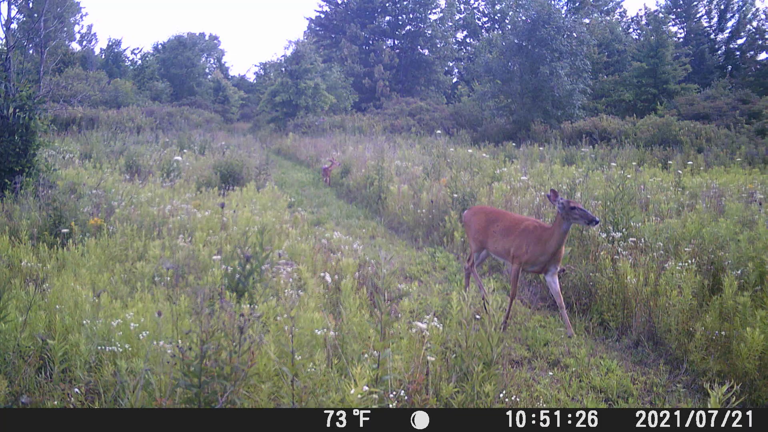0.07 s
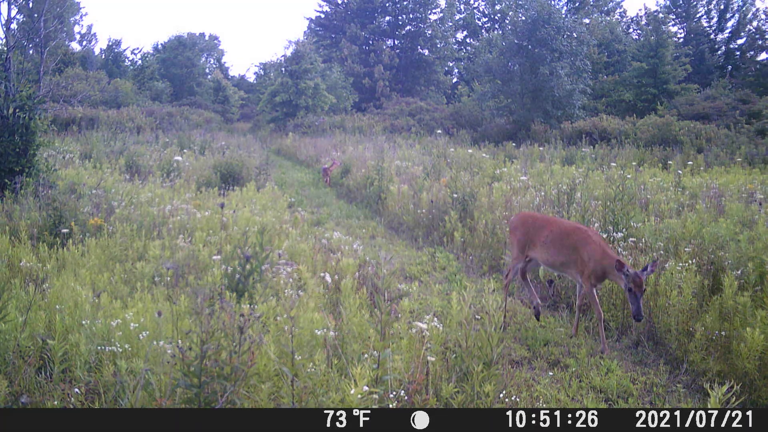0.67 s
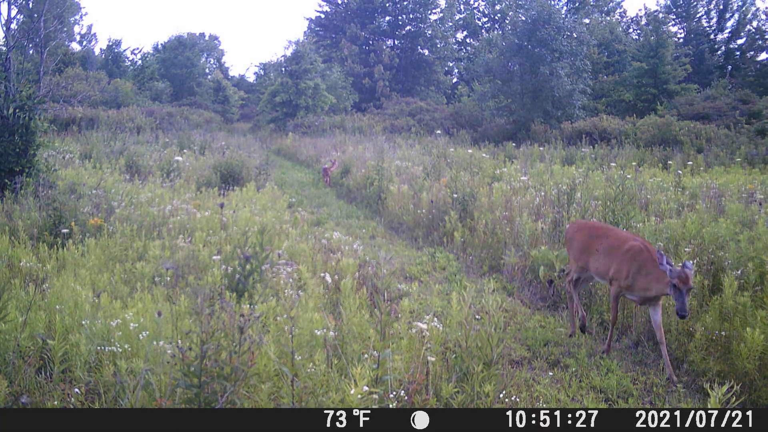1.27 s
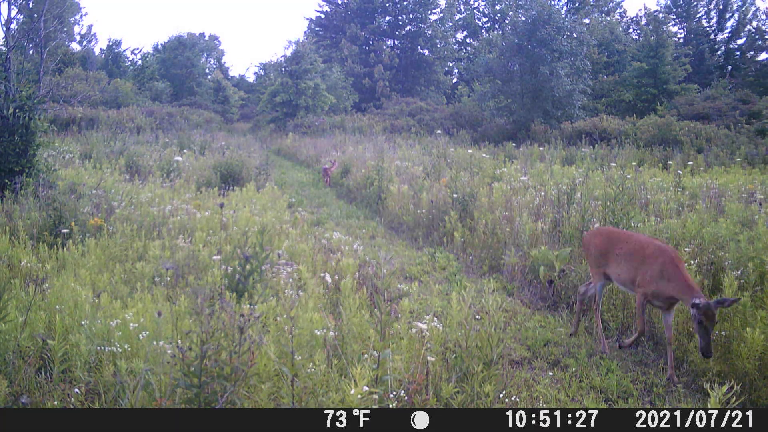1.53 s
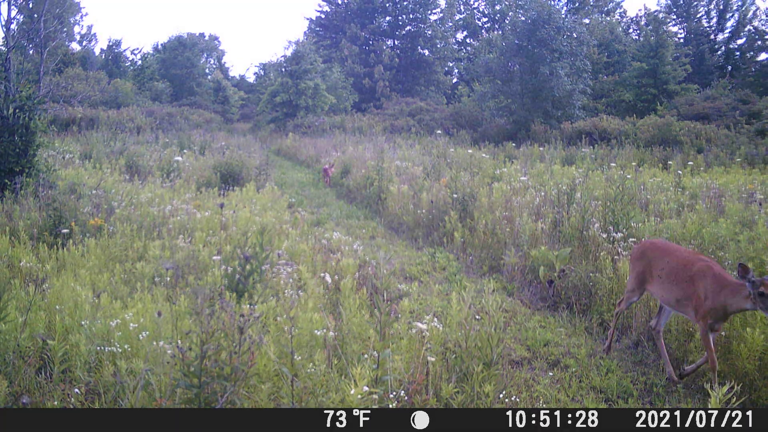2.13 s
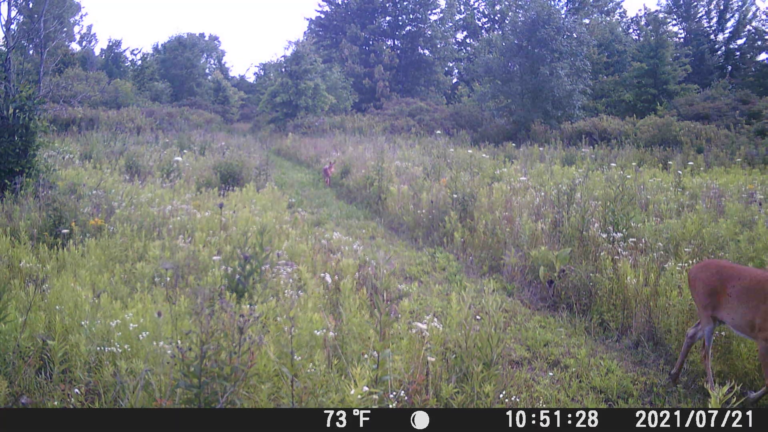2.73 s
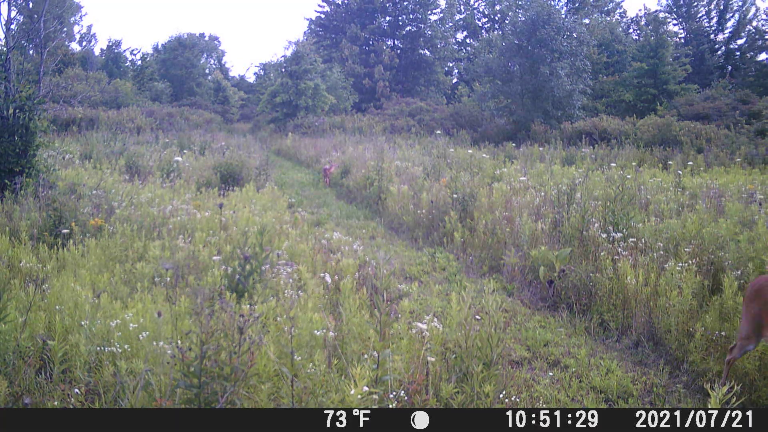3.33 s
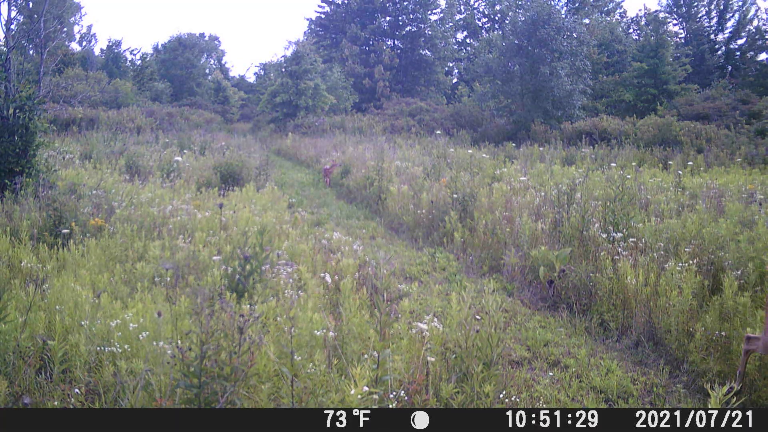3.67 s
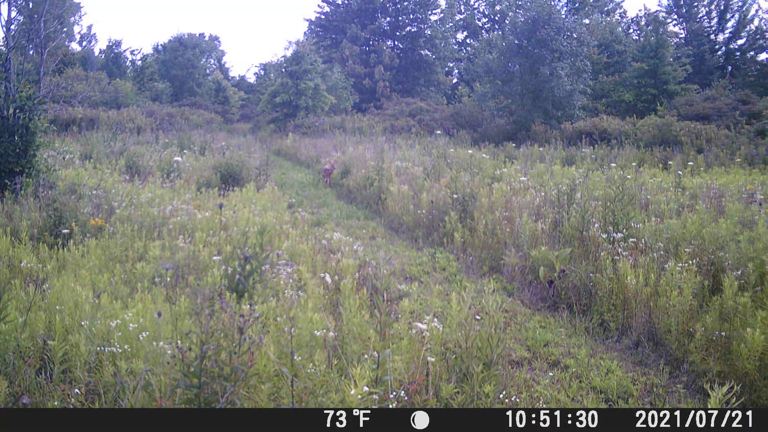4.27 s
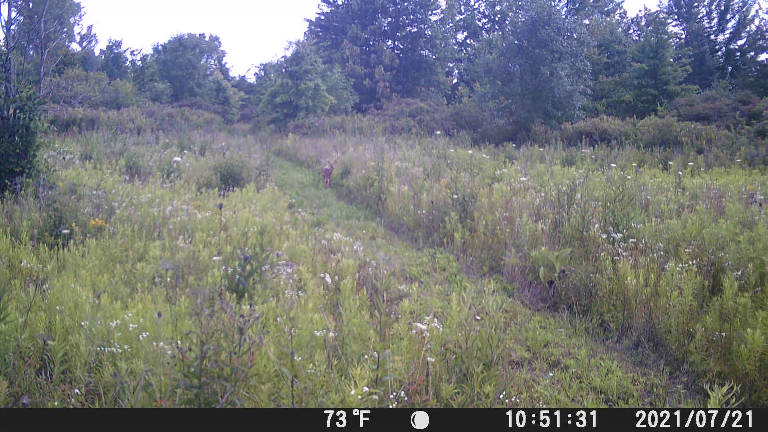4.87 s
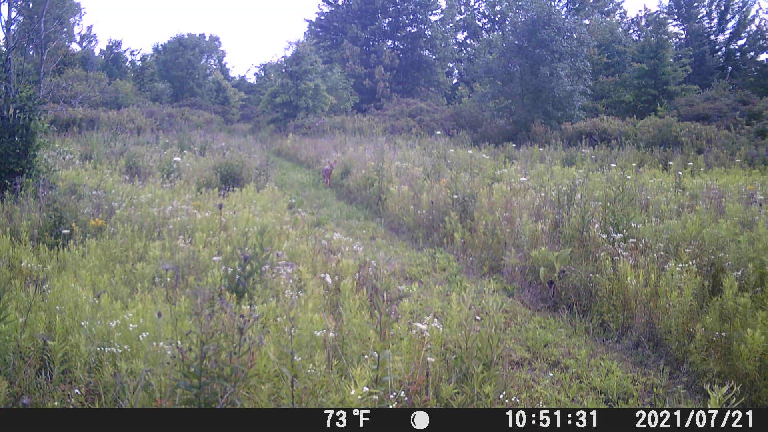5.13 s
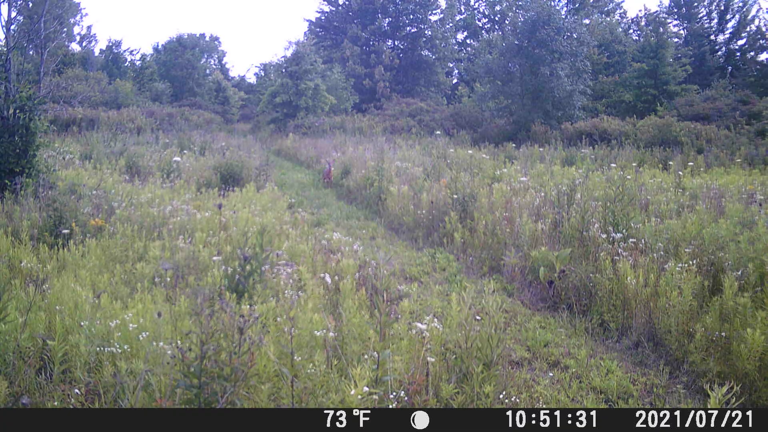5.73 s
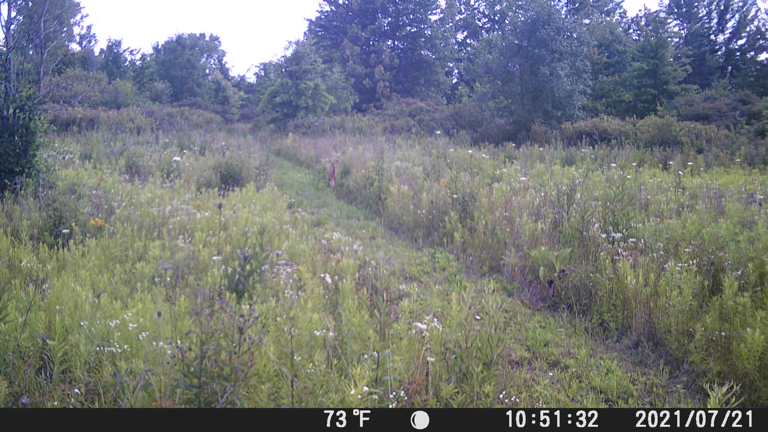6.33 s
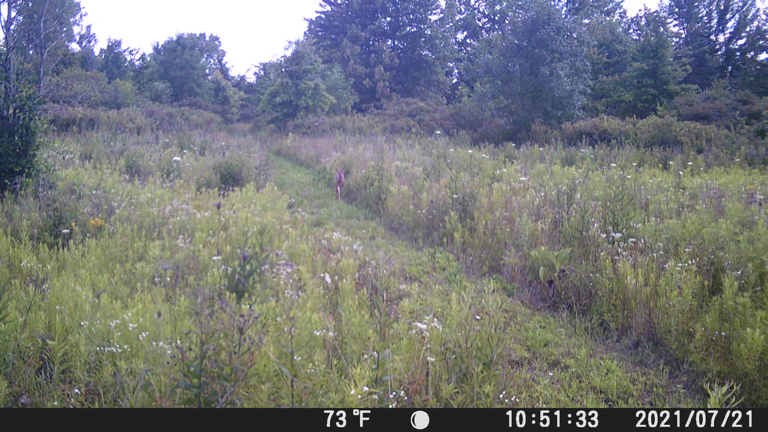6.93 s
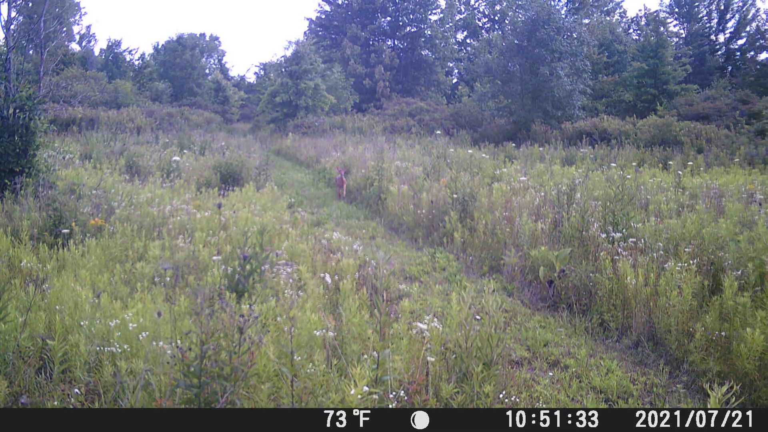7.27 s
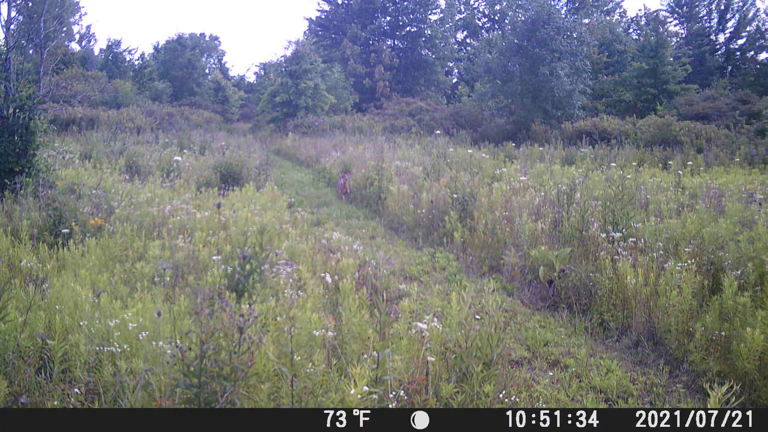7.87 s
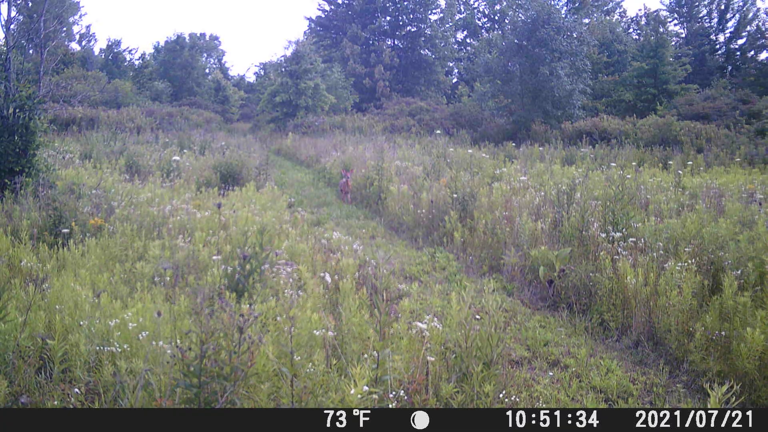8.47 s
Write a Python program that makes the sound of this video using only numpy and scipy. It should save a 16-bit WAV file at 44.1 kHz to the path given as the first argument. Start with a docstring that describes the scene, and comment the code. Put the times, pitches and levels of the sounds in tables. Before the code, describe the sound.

A sharp, thumping pop opens as an outdoor camera's built-in microphone switches on. A quiet meadow follows, with light wind rumbling low over a dull hush. Close up, the electronics hiss and pulse with soft sizzles and tiny bumps about five times a second, along with thin high pips. A distant small bird gives two faint chips, then near the end sings a short phrase twice and chips again.

```python
"""A still summer meadow, heard through a trail camera's built-in microphone. The microphone pops on as the
camera wakes; then come light wind and a dull, low hush. Right at the microphone the electronics hiss, and
sizzle softly five times a second, most likely as the camera writes to its memory card; runs of thin pips
tick along at half that pace. Some way off, a small bird gives two lone chips, then near the end sings
one thin phrase twice and chips once more."""
import sys
import numpy as np
from scipy import signal
from scipy.fft import rfft, irfft
from scipy.io import wavfile

SR = 44100
rng = np.random.default_rng(int(sys.argv[2]) if len(sys.argv) > 2 else 0)


def dump(signal):
    """Clip the signal to [-1, 1] and save it as 16-bit WAV at the path in sys.argv[1]."""
    limited = np.clip(np.atleast_2d(signal).T, -1, 1)
    pcm = np.round(limited * 32767).astype(np.int16)
    wavfile.write(sys.argv[1], SR, pcm)


N = 384111
TIME = np.arange(N) / SR
WAKE_S = .0363


def gain_of(db):
    """Decibels to amplitude."""
    return 10 ** (np.asarray(db) / 20)


def evened(x):
    """Scales to an rms of one."""
    return x / np.sqrt(np.mean(x ** 2) + 1e-20)


def coloured(x, spectrum):
    """Shapes x by (frequency_hz, level_db) points, at an rms of one."""
    hz, db = np.transpose(spectrum)
    shape_db = np.interp(np.log(np.fft.rfftfreq(N, 1 / SR) + 1), np.log(hz + 1), db)
    return evened(irfft(rfft(x) * gain_of(shape_db), N))


def drift(fastest_hz):
    """Random wandering of rms one."""
    t = TIME[::200]
    rates_hz = np.geomspace(fastest_hz / 10, fastest_hz, 20)
    wander = sum(np.sin(2 * np.pi * (hz * t + rng.random())) / np.sqrt(hz) for hz in rates_hz)
    return evened(np.interp(TIME, t, wander))


def add(mix, start_s, sound):
    """Mixes a sound in at start_s."""
    part = mix[round(start_s * SR):][:len(sound)]
    part += sound[:len(part)]


def notch(x, hz, width_hz, depth):
    """Cuts a dip around hz; a sudden edge rings there briefly."""
    b, a = signal.iirnotch(hz, hz / width_hz, SR)
    return depth * signal.lfilter(b, a, x) + (1 - depth) * x


def low_passed(x, hz):
    """A steep band limit."""
    return signal.oaconvolve(x, signal.firwin(201, hz, window=("kaiser", 7), fs=SR), "same")


def wake_pop(step_db, rise_s, drain_s):
    """The microphone's bias switches on: a step overshoots, then drains through the coupling capacitor."""
    t = np.maximum(TIME - WAKE_S, 0)
    step = (1 - np.exp(-t / rise_s)) * np.exp(-t / drain_s)
    thump = notch(step, hz=162, width_hz=174, depth=1.0)  # the slow overshoot
    hollow = notch(thump, hz=4530, width_hz=3600, depth=0.57)  # a hollow, thin edge
    treble_rolloff = signal.butter(2, 9500, fs=SR)
    return gain_of(step_db) * signal.lfilter(*treble_rolloff, hollow)


def light_wind(level_db, swell_db):
    """Light wind at the microphone: a low rumble that flutters a little."""
    # wind spectrum: frequency_hz, level_db
    spectrum = [(3, -12), (10, 1.5), (28, -3.5), (45, -8.5), (80, -15), (102, -14.5), (140, -26),
                (220, -38.5), (600, -65)]
    rumble = coloured(rng.standard_normal(N), spectrum)
    return rumble * gain_of(level_db + swell_db * drift(fastest_hz=10.5))


def low_hush(level_db, swell_db):
    """A dull, steady low-mid noise, barely swelling and sinking."""
    # hush spectrum: frequency_hz, level_db
    spectrum = [(60, -15.5), (150, -3.5), (240, 2), (380, -0.5), (520, -2.5), (800, -9.5), (2000, -45)]
    hush = coloured(rng.standard_normal(N), spectrum)
    return hush * gain_of(level_db + swell_db * drift(fastest_hz=2.3))


def camera_hiss(level_db):
    """The steady self-noise of the camera's electronics."""
    # hiss spectrum: frequency_hz, level_db
    spectrum = [(100, 0.5), (1000, 0), (2000, -5.5), (3000, -10), (4000, -14.5), (4700, -19), (5500, -18.5),
                (6200, -15), (7200, -14), (7700, -16), (8100, -23), (8600, -28)]
    return gain_of(level_db) * coloured(rng.standard_normal(N), spectrum)


def write_clock(first_s=.244, every_s=.2, backlog_cycle_s=.429, backlog_peak_s=1.444):
    """Card writes follow a clock; a backlog builds and clears, so about every other is late and strong."""
    ticks = np.arange(first_s, N / SR, every_s)
    backlog = .5 + .5 * np.cos(2 * np.pi * (ticks - backlog_peak_s) / backlog_cycle_s)
    late, loud, long = rng.standard_normal((len(ticks), 3)).T
    starts_s = ticks + .027 * backlog + .003 * late
    levels_db = -1.5 * (1 - backlog) + 0.7 * loud
    stretches = np.exp(.1 * long)
    return zip(starts_s, levels_db, stretches)


def card_writes(length_s, sizzle_db, grain_db, surge, surge_s, waver_hz, bump_db, bump_s):
    """Each write leaks a burst of sizzle and whine into the microphone and tugs at its supply."""
    # sizzle spectrum: frequency_hz, level_db
    sizzle_spectrum = [(300, 4), (1200, 3), (2500, 2.5), (4300, -6), (5400, -3.5), (6100, -6), (8050, 3),
                       (8500, -15)]
    # tones of the whine: pitch_hz, level_db
    whine_tones = [(1147, -83), (4750, -97.5), (6110, -92.5), (6260, -94.5), (7216, -92)]
    busy, bumps, whine = np.zeros((3, N))
    bump = gain_of(bump_db) * signal.windows.hann(int(bump_s * SR))
    for start_s, db, stretch in write_clock():
        t = TIME[:int(length_s * stretch * SR)]
        inrush = 1 + surge * np.exp(-t / surge_s)  # the current is highest at first
        add(busy, start_s, gain_of(db) * inrush * signal.windows.tukey(len(t), .1))
        add(bumps, start_s, bump)  # the load comes on
        add(bumps, start_s + (len(t) - len(bump)) / SR, -bump)  # and goes off again
    noise = rng.standard_normal(N)
    grain = np.repeat(rng.standard_normal(N), 40)[:N]  # a new level about every millisecond
    sizzle = gain_of(sizzle_db) * coloured(noise * gain_of(grain_db * grain), sizzle_spectrum)
    for hz, db in whine_tones:
        pitch_hz = hz + waver_hz * drift(fastest_hz=200)
        whine += gain_of(db) * np.sqrt(2) * np.sin(2 * np.pi * np.cumsum(pitch_hz) / SR)
    return busy * (sizzle + whine) + bumps


def pip_runs(first_s, every_s, run_s, pitch_hz, pips_per_s, pip_s, level_db):
    """On a slower beat of their own, the electronics tick out quick runs of thin pips."""
    pips, t = np.zeros(N), TIME[:int(pip_s * SR)]
    for start_s in np.arange(first_s, N / SR, every_s):
        for offset_s in np.arange(0, run_s * rng.uniform(0.55, 1.4), 1 / pips_per_s):
            slip, phase, size = rng.random(3)
            pip = signal.windows.hann(len(t)) * np.sin(2 * np.pi * (pitch_hz * t + phase))
            add(pips, start_s + offset_s + slip * pip_s, gain_of(level_db) * (.5 + size) * pip)
    return pips


def whistle(length_s, first_hz, middle_hz, last_hz, level_db):
    """One pure bird note that bends through three pitches."""
    progress = np.linspace(0, 1, int(length_s * SR))
    bend = np.polyfit([0, .5, 1], [first_hz, middle_hz, last_hz], 2)
    pitch_hz = np.polyval(bend, progress)
    swell = signal.windows.tukey(len(progress), .25)
    return gain_of(level_db) * np.sqrt(2) * swell * np.sin(2 * np.pi * np.cumsum(pitch_hz) / SR)


def distant_bird(echo_db, echo_t60_s):
    """A small bird chips and sings some way off, with a faint scatter from the tree line."""
    # lone high chips: start_s, length_s, first_hz, middle_hz, last_hz, level_db
    chips = [(2.040, .030, 6230, 6150, 6100, -84), (3.970, .030, 6200, 6150, 6100, -84.5),
             (7.423, .013, 6500, 5630, 5100, -77)]
    # the phrase, an arch, a rise and two falls: offset_s, length_s, first_hz, middle_hz, last_hz, level_db
    phrase = [(0, .046, 3150, 4090, 3250, 0), (.076, .034, 3300, 3680, 4150, 0),
              (.209, .054, 5900, 5250, 4900, -3), (.282, .072, 4480, 3780, 3200, -0.5)]
    # the two times it is sung: start_s, level_db
    repeats = [(6.533, -85), (7.043, -81.5)]
    song = np.zeros(N)
    for start_s, *note in chips:
        add(song, start_s, whistle(*note))
    for start_s, db in repeats:
        for offset_s, *note in phrase:
            add(song, start_s + offset_s, gain_of(db) * whistle(*note))
    trees = rng.standard_normal(SR // 2) * np.exp(-np.log(1000) * TIME[:SR // 2] / echo_t60_s)
    echo = signal.fftconvolve(song, trees / np.linalg.norm(trees))[:N]
    return song + gain_of(echo_db) * echo


def scene():
    """Meadow and electronics at one microphone, silent until the camera wakes."""
    pop = wake_pop(step_db=-16.5, rise_s=.00004, drain_s=0.11)
    wind = light_wind(level_db=-53.5, swell_db=1.76)
    hush = low_hush(level_db=-69, swell_db=0.43)
    hiss = camera_hiss(level_db=-68)
    writes = card_writes(length_s=0.0542, sizzle_db=-77.5, grain_db=5.5, surge=0.82, surge_s=0.009,
                         waver_hz=28, bump_db=-47, bump_s=0.017)
    pips = pip_runs(first_s=.27, every_s=.402, run_s=.11, pitch_hz=7940, pips_per_s=80, pip_s=0.0055,
                    level_db=-78.5)
    bird = distant_bird(echo_db=-6, echo_t60_s=.2)
    heard = low_passed(wind + hush + hiss + writes + pips + bird, hz=8600)
    return (pop + heard * (TIME > WAKE_S))[None]


def record(dry):
    """The camera cuts a wide notch in the low mids and limits the top of its mono track."""
    scooped = notch(dry[0], hz=633.3, width_hz=660, depth=0.9)
    return low_passed(scooped, hz=15800)[None]


dry = scene()
out = record(dry)
dump(out)
```